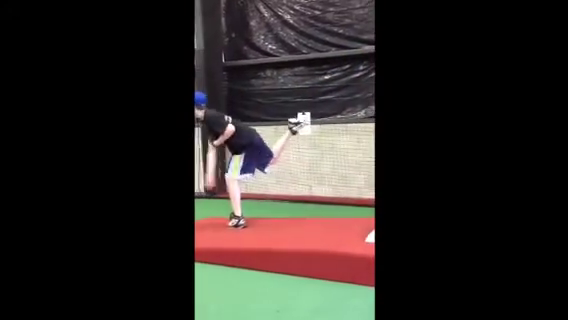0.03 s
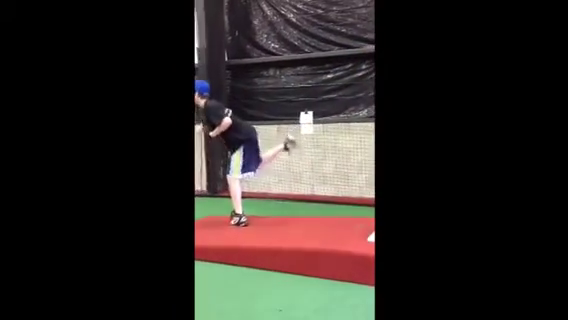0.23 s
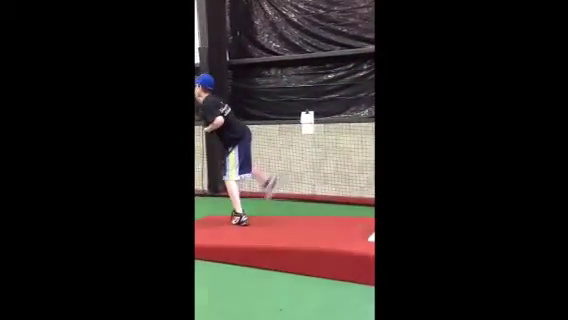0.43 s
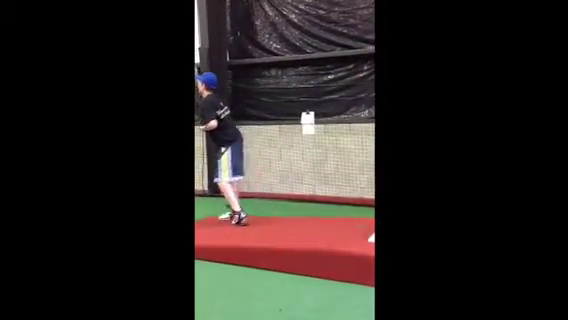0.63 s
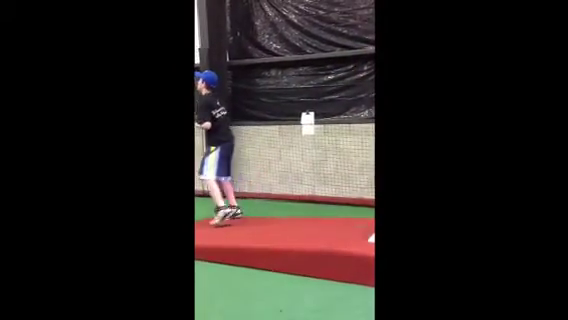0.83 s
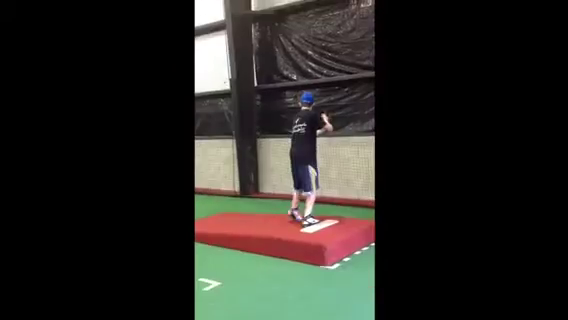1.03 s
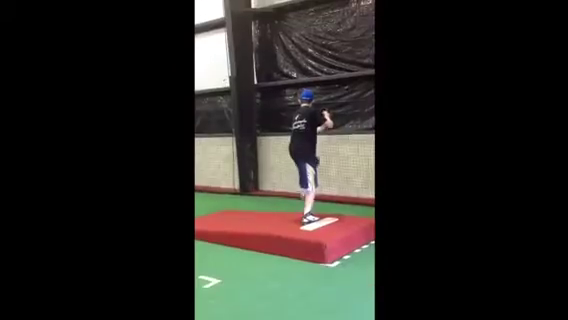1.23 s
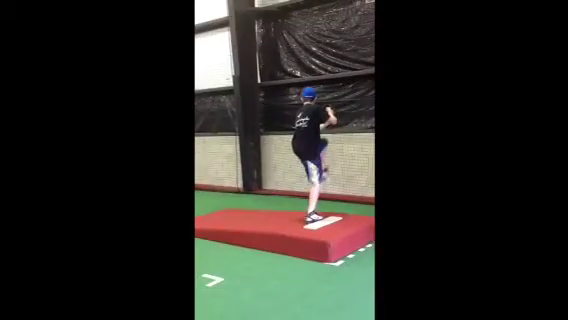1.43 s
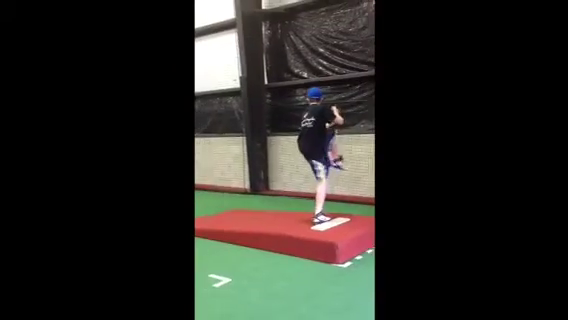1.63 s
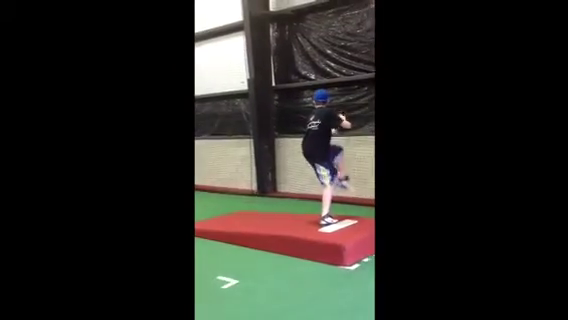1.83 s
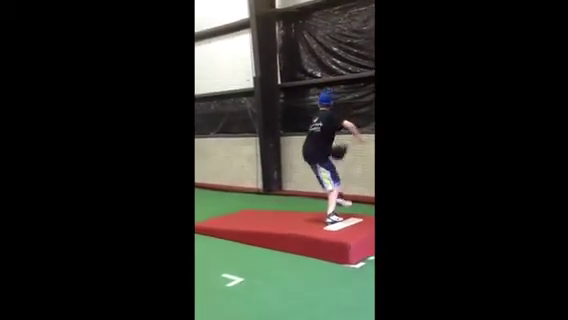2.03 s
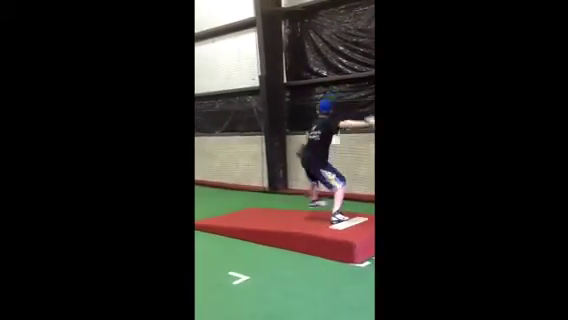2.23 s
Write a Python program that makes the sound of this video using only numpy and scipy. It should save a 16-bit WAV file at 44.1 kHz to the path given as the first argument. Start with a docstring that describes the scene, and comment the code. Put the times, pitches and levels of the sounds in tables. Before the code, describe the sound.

A baseball smacks sharply into a leather mitt at about 0.2 seconds, and the indoor hall rings on with low echoes over quiet ventilation hiss and hum. At about 1 second the sound cuts out abruptly, then the ventilation gradually fades back in. From about 2.1 to 2.3 seconds a shoe faintly scuffs the pitching mound and lands with a soft thud.

```python
"""Baseball caught in a practice hall

Indoors, one microphone, mono. A pitch smacks into a leather mitt; floor and walls throw it back and
the hall rings on. Ventilation hisses and hums underneath. The sound cuts out abruptly and fades
back in, and a shoe scuffs and lands on the mound in the next stride."""
import sys
import numpy as np
from scipy import signal
from scipy.fft import rfft, irfft
from scipy.io import wavfile
from scipy.ndimage import uniform_filter1d

SR = 44100
rng = np.random.default_rng(int(sys.argv[2]) if len(sys.argv) > 2 else 0)


def master_out(mix):
    """Clip the mix to full scale and print it as 16-bit PCM to the path in sys.argv[1]."""
    frames = np.transpose(np.atleast_2d(mix))
    ceiling = np.clip(frames, -1, 1)
    pcm = np.round(ceiling * 32767).astype(np.int16)
    wavfile.write(sys.argv[1], SR, pcm)


N = 105840
T = np.arange(N) / SR
HIT_S, EDGE_HZ = .2017, 15300  # moment of the catch; top of the band
LN_1000 = np.log(1000)  # a fall of 60 dB


def amp(db):
    """Decibels to gain."""
    return 10 ** (np.asarray(db) / 20)


def unit(x):
    """Scales to rms 1."""
    return x / np.sqrt(np.mean(x ** 2) + 1e-20)


def read(points, hz):
    """Reads a table on a log-frequency axis."""
    f, value = np.transpose(points)
    return np.interp(np.log(hz + 1), np.log(f + 1), value)


def noise(spectrum, field_db=lambda hz, t: 0):
    """Coloured noise of rms 1, rippled by standing waves, then shaped in dB over frequency and time."""
    bins, knots_hz = np.fft.rfftfreq(N, 1 / SR), 34.95 * np.arange(2048)
    ripple_db = 2.11 * np.interp(bins, knots_hz, rng.standard_normal(len(knots_hz)))
    colour = amp(read(spectrum, bins) + ripple_db)
    steady = unit(irfft(rfft(rng.standard_normal(N)) * colour, N))
    hz, t, frames = signal.stft(steady, SR, nperseg=512, noverlap=384)
    return signal.istft(frames * amp(field_db(hz, t)), SR, nperseg=512, noverlap=384)[1][:N]


def envelope(start, rise, t60, hold=0):
    """Straight rise, hold, exponential release; times in seconds."""
    released_s = np.maximum(T - start - rise - hold, 0)
    return np.clip((T - start) / rise, 0, 1) * np.exp(-LN_1000 * released_s / t60)


# modes of ball and mitt: f/Hz, level/dB, t60/s
MITT_MODES = [(198, -14.5, 0.043), (360, -15.5, 0.03), (607, -19.5, .028), (765, -18, .03),
              (926, -24, 0.035), (1356, -25.5, .032), (1470, -23, .032), (1644, -22.5, 0.041),
              (2022, -22.5, 0.052), (2426, -24, 0.027), (3270, -21.5, 0.014), (4180, -30, 0.012),
              (4710, -18.5, 0.028), (6090, -26, .02), (7840, -29.5, .014)]
# slap of the leather: f/Hz, level/dB (per Hz)
SLAP_SPECTRUM = [(100, -30), (400, -5.5), (1200, -7), (2200, -1.5), (2900, -7.5), (3500, 0), (5000, -2),
                 (7000, -9.5), (10000, -14.5), (15000, -16.5)]

def smack():
    """The ball stops in the pocket, heard direct: a slap of leather, damped modes and a brief shudder."""
    squeeze_s, slap_peak_s = .0013, .00076
    t = np.maximum(T - HIT_S, 0)
    ring = sum((-1) ** k * amp(db) * np.exp(-LN_1000 * t / t60) * np.sin(2 * np.pi * hz * t)
               for k, (hz, db, t60) in enumerate(MITT_MODES))
    squeeze = 1 - np.exp(-(t / squeeze_s) ** 2)  # the leather gives way
    pulse = t / slap_peak_s * np.exp(1 - t / slap_peak_s)
    slap = amp(-19.5) * pulse * noise(SLAP_SPECTRUM)
    shudder = amp(-29) * envelope(HIT_S, slap_peak_s, t60=.06) * noise(SLAP_SPECTRUM)
    return ring * squeeze + slap + shudder


def mitt_colour(room, strength=.5):
    """The room sound keeps the pitches of the smack that set it off."""
    peaks = (signal.iirpeak(hz, Q=hz * t60 * np.pi / LN_1000, fs=SR) for hz, _, t60 in MITT_MODES)
    return room + strength * sum(signal.lfilter(b, a, room) for b, a in peaks)


# bounces off floor, mound and walls: t/s after the catch, level/dB, treble edge f/Hz
NEAR_ECHOES = [(.0052, -10, 7000), (0.0154, -12.5, 4000), (.0205, -8.5, 7000), (.0272, -12.5, 3000)]
# scatter from the nearby walls: f/Hz, level/dB (per Hz)
SCATTER_SPECTRUM = [(80, -41), (150, -12), (230, 5), (350, -8.5), (500, -2.5), (700, -4.5), (950, -1.5),
                    (1400, -5), (2300, -14), (2850, -16.5), (3500, -16.5), (4600, -12), (8000, -25.5),
                    (15000, -36.5)]

def reflections(hit):
    """The nearest surfaces send the microphone thinner, duller copies of the smack and some scatter."""
    burst = envelope(HIT_S + .012, rise=.003, t60=.056, hold=.013)
    out = amp(-27.5) * mitt_colour(noise(SCATTER_SPECTRUM)) * burst
    bass_hz = 228
    for delay, db, treble_hz in NEAR_ECHOES:
        dull = signal.lfilter(*signal.butter(1, [bass_hz, treble_hz], "band", fs=SR), hit)
        out += amp(db) * np.interp(T - delay, T, dull, left=0)
    return out


# reverberation of the hall: f/Hz, level/dB (per Hz), t60/s
HALL_BANDS = [(70, -39, .8), (130, -9.5, 1.9), (176, 0, 1.0), (240, 7.5, 0.53), (330, -1.5, .55),
              (550, 4.5, 0.32), (730, -0.5, 0.8), (900, 2, .62), (1140, -5, 0.68), (1800, -6.5, 0.95),
              (2400, -11, 1.5), (2900, -10, .85), (3550, -10, .85), (4500, -9, 1), (7300, -15, .68),
              (11000, -22.5, 0.59), (15000, -31, .33)]
# slow ring of the roof space: f/Hz, level/dB (per Hz)
ROOF_SPECTRUM = [(80, -24.5), (130, -2), (190, 1), (400, -10), (600, -20), (900, -7.5), (2000, -12.5),
                 (3300, -7), (6000, -18.5), (12000, -29)]

def hall():
    """A diffuse tail around the microphone, each band dying at its own speed; a slower ring overhead."""
    bands, start = np.array(HALL_BANDS), HIT_S + .011
    spectrum, decay_times, rise_s = bands[:, :2], bands[:, ::2], .017

    def fall_db(hz, t):
        return -60 * np.maximum(t - start, 0) / read(decay_times, hz)[:, None]

    tail = noise(spectrum, fall_db) * np.clip((T - start) / rise_s, 0, 1)
    roof = noise(ROOF_SPECTRUM) * envelope(start, rise=.25, t60=2.23)
    return amp(-27.5) * tail + amp(-44.5) * roof


# returns from the far walls: t/s, level/dB
FAR_ECHOES = [(.325, -37), (0.411, -37), (.465, -39.5), (0.551, -43)]
# their boom: f/Hz, level/dB (per Hz)
BOOM_SPECTRUM = [(90, -30), (160, -2), (200, -7), (260, -8), (400, -19), (1500, -48), (8000, -70)]

def far_walls():
    """The thump comes back from across the hall, low and smeared."""
    returns = sum(amp(db) * envelope(start, rise=.0048, t60=.056) for start, db in FAR_ECHOES)
    return noise(BOOM_SPECTRUM) * returns


# shoe on the mound: t/s, scuff level/dB, thud level/dB, rise/s, t60/s
SHOE_CONTACTS = [(2.077, -55.5, -64, 0.035, 0.93), (2.14, -68, -56.5, .01, 0.17),
                 (2.29, -62, -58, 0.013, 0.46)]
# sole scraping: f/Hz, level/dB (per Hz)
SCUFF_SPECTRUM = [(100, -25), (600, -11), (1050, 1.5), (1250, -1), (1430, 4.5), (1900, -9), (2500, -5.5),
                  (3200, -10), (6000, -19), (14000, -35)]
# foot landing: f/Hz, level/dB (per Hz)
THUD_SPECTRUM = [(50, -40), (120, -18), (175, -2), (350, -23), (600, -21), (3000, -35)]

def stride():
    """Over on the mound a shoe scrapes the turf and lands with a soft thud, blurred by the hall."""
    out = np.zeros(N)
    for start, scuff_db, thud_db, rise, t60 in SHOE_CONTACTS:
        contact = amp(scuff_db) * noise(SCUFF_SPECTRUM) + amp(thud_db) * noise(THUD_SPECTRUM)
        out += contact * envelope(start, rise, t60)
    return out


# ventilation under the catch: f/Hz, level/dB (per Hz)
CATCH_AIR = [(18, -62), (30, -29.5), (75, -9), (113, 2.5), (180, -6), (228, -1.5), (404, -3.5), (437, -10),
             (472, 0), (511, -10), (716, -6.5), (774, -12), (1200, -8.5), (4200, -12), (15000, -27)]
# ventilation under the stride: f/Hz, level/dB (per Hz)
STRIDE_AIR = [(30, -36), (85, -12), (107, -14.5), (140, 3.5), (180, -8), (230, -7), (364, -3.5),
              (437, -12.5), (500, -11.5), (600, -12.5), (900, -11), (1440, -12.5), (1870, -13),
              (2450, -10.5), (3000, -15), (4000, -15), (8000, -21.5), (11900, -23), (15000, -33)]
# fan hum: f/Hz, level/dB relative to the air
FAN_TONES = [(122, -17), (360, -19), (479, -17), (900, -19.5),
             (1200, -26.5), (2347, -28.5), (2480, -28), (3095, -27.5)]

def ventilation(spectrum, brighten_db_per_s=0, patch_db=.87, waver_hz=1.4):
    """Room tone of the hall: gently patchy air noise with faint, wavering fan tones."""
    def drift_db(hz, t):
        field = rng.standard_normal((len(t), len(hz))).T
        patches = uniform_filter1d(uniform_filter1d(field, size=6, axis=0), size=24, axis=1)
        treble_swell_db = brighten_db_per_s * np.sqrt(hz / EDGE_HZ)[:, None] * t
        return patch_db * unit(patches) + treble_swell_db

    out = noise(spectrum, drift_db)
    for hz, db in FAN_TONES:
        waver = waver_hz * unit(uniform_filter1d(rng.standard_normal(N), size=3000))
        out += amp(db) * unit(np.sin(2 * np.pi * np.cumsum(hz + waver) / SR))
    return out


def scene():
    """The catch over a background that slowly grows louder; the sound cuts out, then fades back in for the next
    stride."""
    cut_s, cut_t60_s, gap_s, swell_db_per_s = 1.0205, .063, .013, 2
    hit = smack()
    catch = hit + reflections(hit) + mitt_colour(hall()) + far_walls()
    catch_air = amp(-51.5 + swell_db_per_s * T) * ventilation(CATCH_AIR, brighten_db_per_s=4)
    stride_air = amp(-57.5) * ventilation(STRIDE_AIR)
    dying = amp(-13.5) * np.exp(-LN_1000 * np.maximum(T - cut_s, 0) / cut_t60_s)
    cut = np.where(T < cut_s, 1, dying)
    fade_in = (np.maximum(T - cut_s - gap_s, 0) / (T[-1] - cut_s)) ** .89
    mono = (catch + catch_air) * cut + stride_air * fade_in + stride()
    return np.array([mono, mono])


def record(dry):
    """The microphone sheds deep bass and rounds the highest peaks; then the band limit."""
    low_cut = signal.butter(N=4, Wn=112, btype="high", fs=SR, output="sos")
    rounded = np.tanh(signal.sosfilt(low_cut, dry))
    band_limit = signal.firwin(511, EDGE_HZ, window=("kaiser", 9), fs=SR)
    return signal.oaconvolve(rounded, band_limit[None], "same")


dry = scene()
out = record(dry)
master_out(out)
```